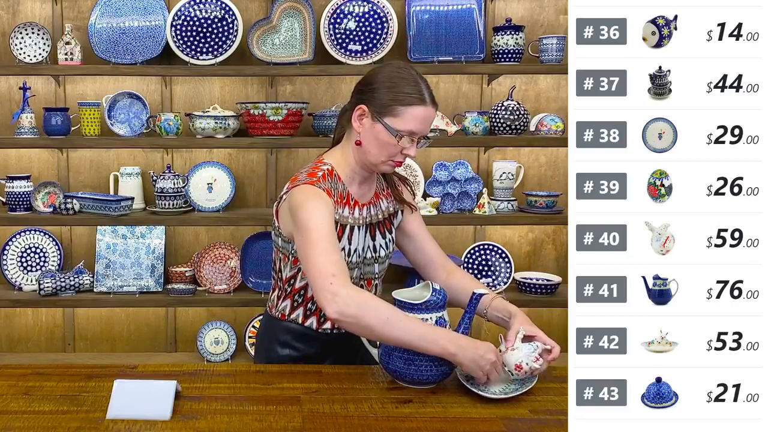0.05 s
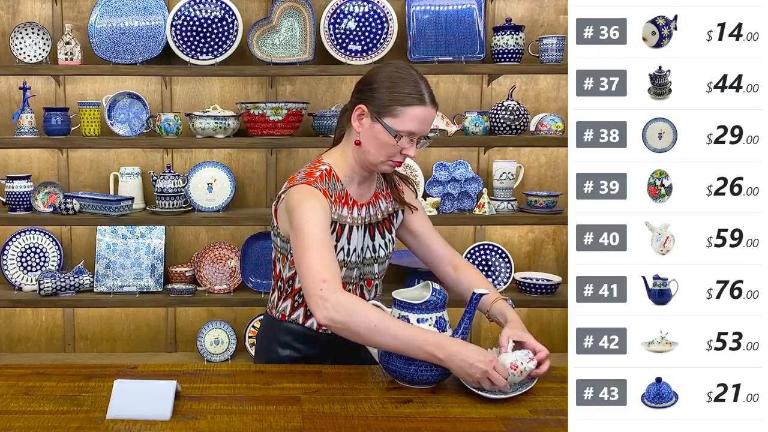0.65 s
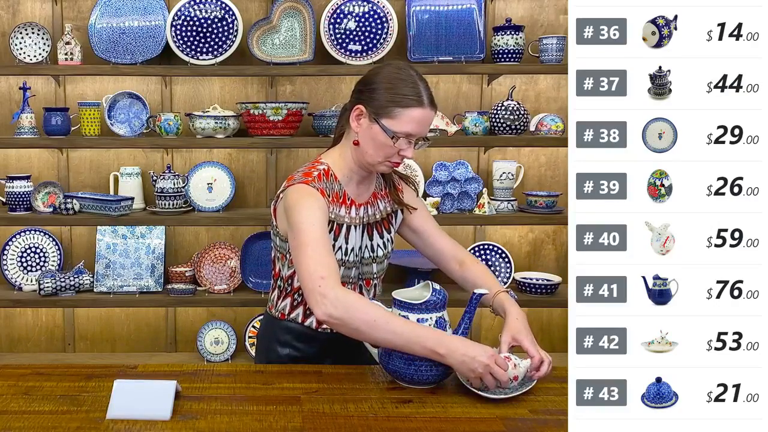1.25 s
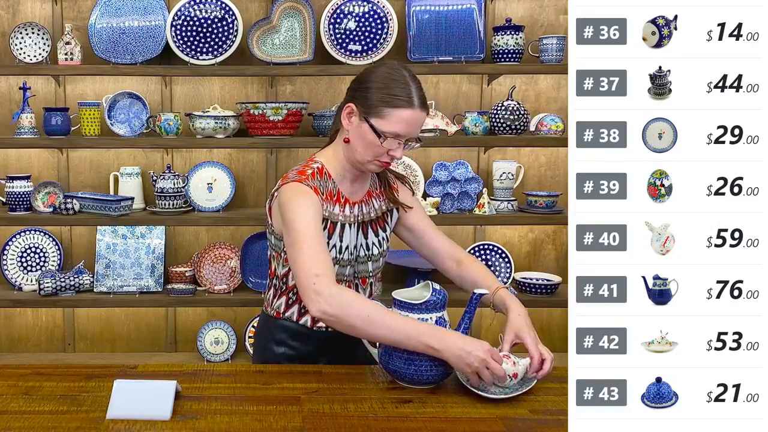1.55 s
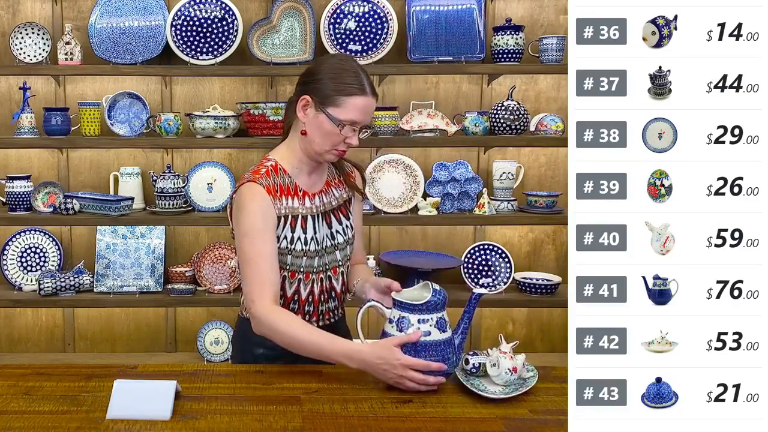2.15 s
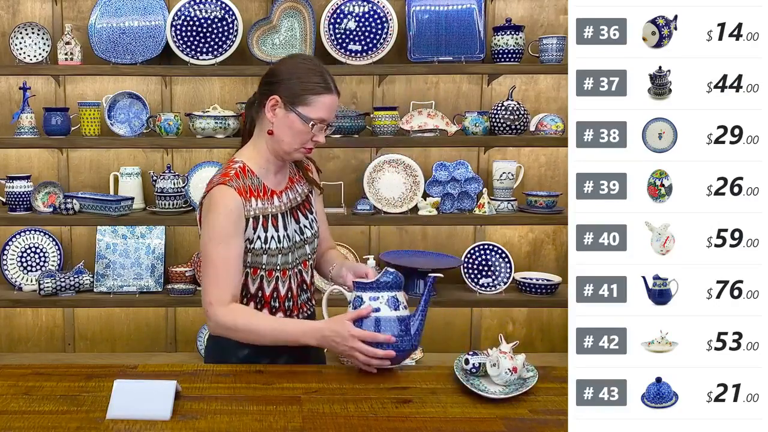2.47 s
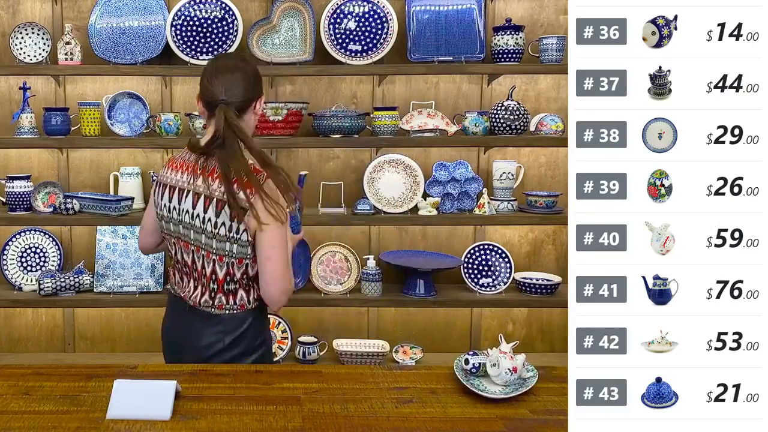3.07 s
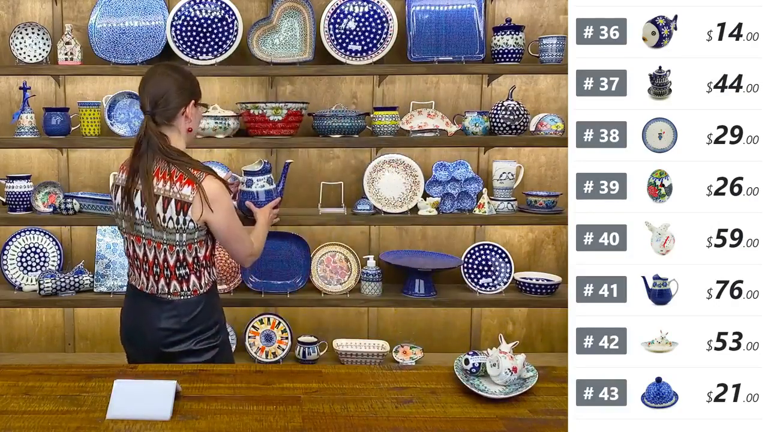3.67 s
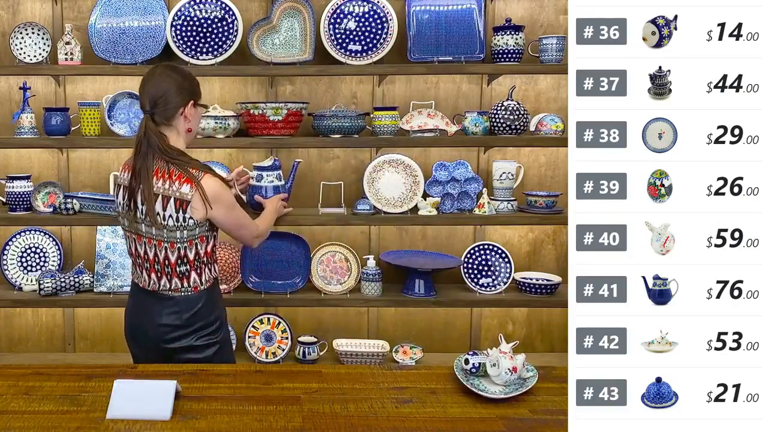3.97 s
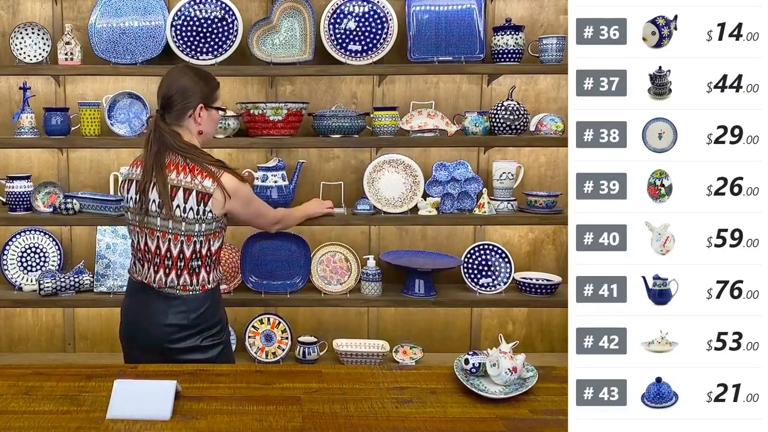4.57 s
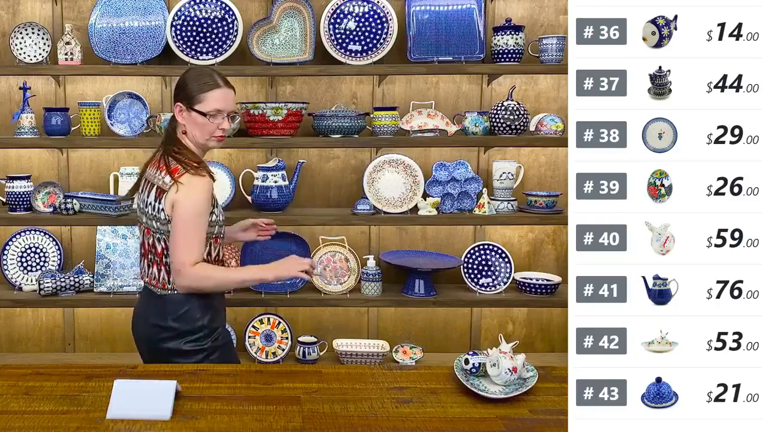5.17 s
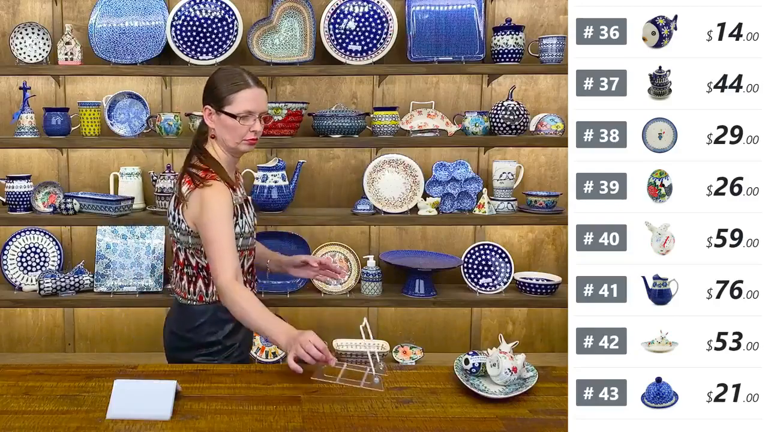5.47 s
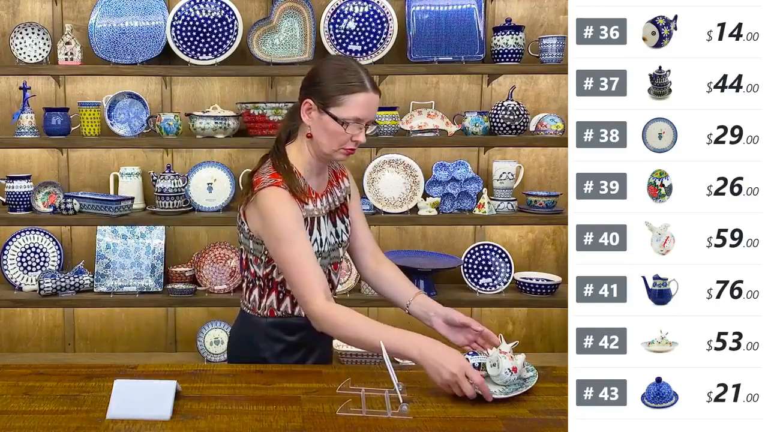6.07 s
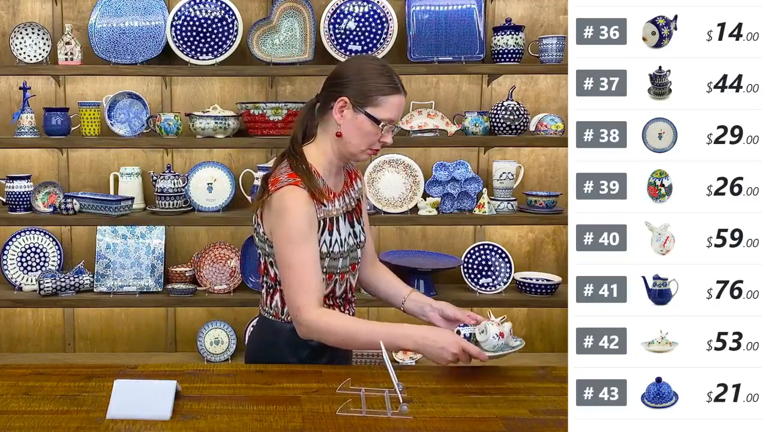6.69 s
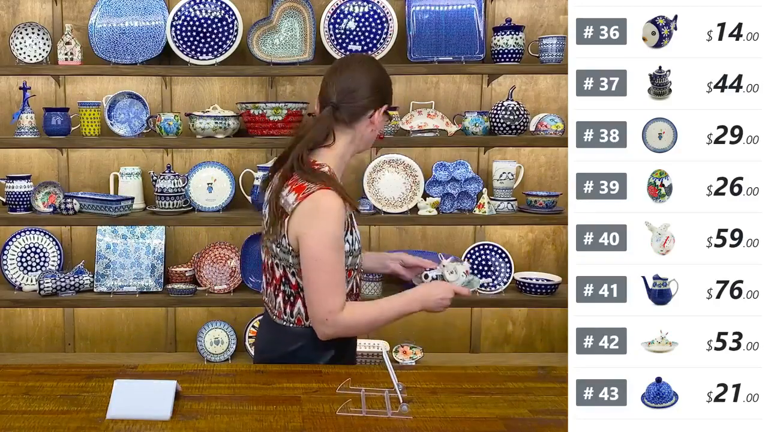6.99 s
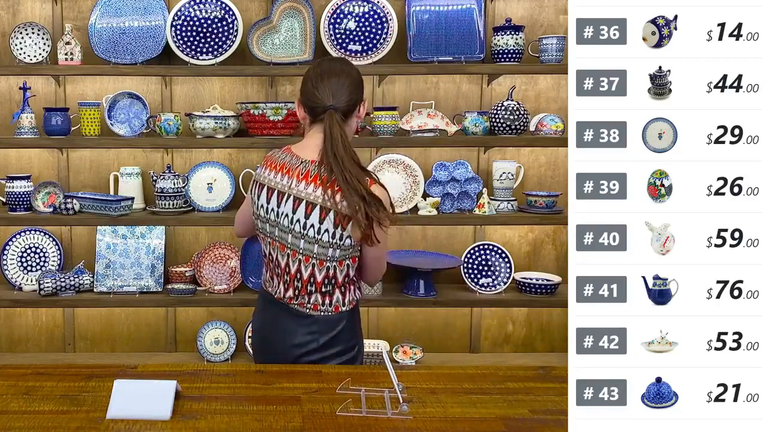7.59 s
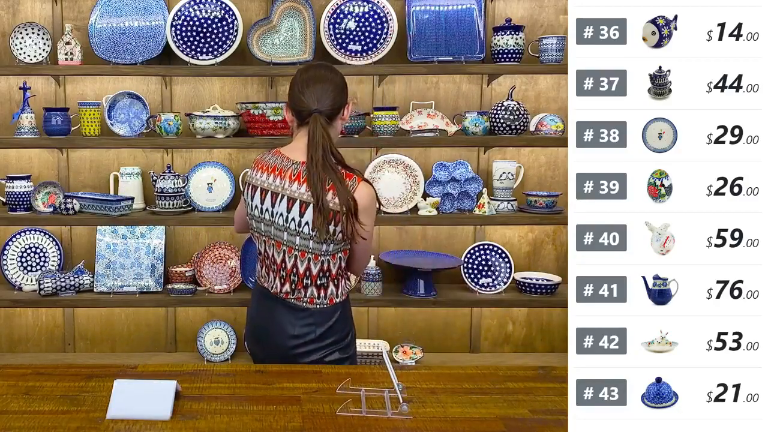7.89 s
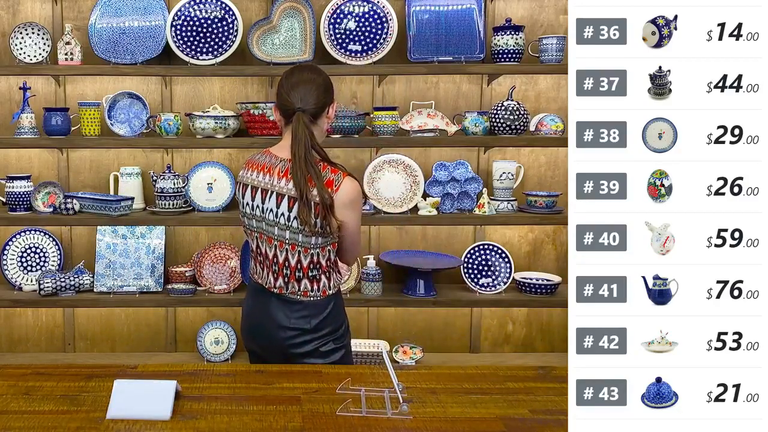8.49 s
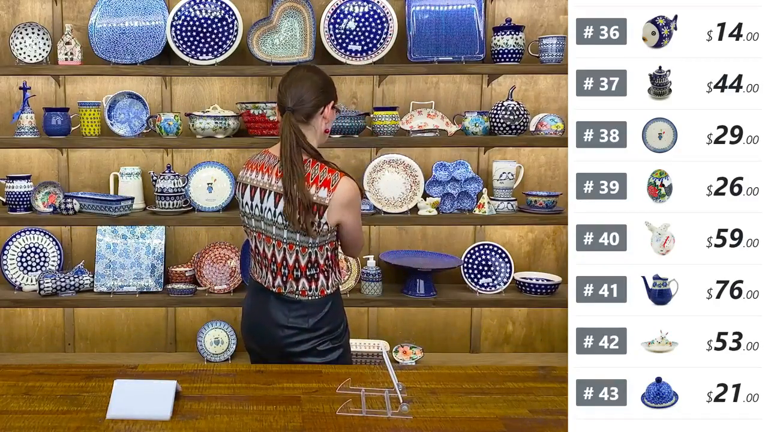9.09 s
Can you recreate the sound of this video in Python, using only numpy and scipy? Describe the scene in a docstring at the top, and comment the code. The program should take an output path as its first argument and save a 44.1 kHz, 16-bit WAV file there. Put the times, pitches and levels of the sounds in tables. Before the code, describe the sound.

Ceramic dishes clink together, slide and thud onto wood in a quiet room, with a small wire stand clattering midway.

```python
"""Glazed pottery clinks, squeaks and slides as it is handled in a wood-panelled shop.
A creamer knocks on a plate; a teapot is dragged off the counter and set on a shelf; a display stand is
fetched and clatters down; the plate is carried off, rattling, and shelved. Each blow clacks, rings the
piece and thuds into the wood; slides and swishing clothes are showers of tiny slips.
A bracelet jingles faintly, and the room rings with it all, over a low rush of ventilation."""
import sys
import numpy as np
from scipy import signal
from scipy.fft import rfft, irfft, next_fast_len
from scipy.io import wavfile
from scipy.ndimage import uniform_filter1d

SR = 44100
rng = np.random.default_rng(int(sys.argv[2]) if len(sys.argv) > 2 else 0)


def generate_wav(sig):
    """Save sig (samples, or channels by samples) to the path in sys.argv[1] as 16-bit PCM at SR."""
    pcm = np.round(np.clip(np.atleast_2d(sig).T, -1, 1) * 32767).astype(np.int16)
    wavfile.write(sys.argv[1], SR, pcm)


N = 411894
T = np.arange(N) / SR
RING_T = T[:SR // 2]


def undb(db):
    """Decibels to gain."""
    return 10 ** (np.asarray(db) / 20)


def at_hz(points, hz):
    """Read a curve of (f/Hz, value) points on a log-frequency axis."""
    f, value = np.transpose(points)
    return np.interp(np.log(np.maximum(hz, 1)), np.log(f), value)


def colour(x, points):
    """EQ a sound with (f/Hz, level/dB) points and bring it to rms 1."""
    size = next_fast_len(len(x))
    eq = undb(at_hz(points, np.fft.rfftfreq(size, 1 / SR)))
    y = irfft(rfft(x, size) * eq, size)[:len(x)]
    return y / y.std()


def decay(t60, t=RING_T):
    """Exponential envelope, 60 dB down after t60 seconds."""
    return np.exp(-np.log(1000) * t / t60)


def attack_level(x, db):
    """Set the rms level of a hit's first 20 ms."""
    return x * undb(db) / np.sqrt(np.mean(x[:SR // 50] ** 2))


def wander(knots_per_s):
    """Slewed random modulation with a spread near 1."""
    knots = rng.standard_normal(N // 10)
    return np.interp(T * knots_per_s, np.arange(len(knots)), knots)


def impulses(per_s):
    """Clicks of random size at random times."""
    return (rng.random(N) < per_s / SR) * rng.standard_normal(N)


def ring(modes, scatter_db=-1.5, detune=0.0018, split=0.0077, twin_db=-8):
    """Decaying modes: the struck spot sets their strength, and asymmetry gives each a beating twin."""
    out = 0
    for hz, db, t60 in modes:
        polarity, strength, mistune, spacing, twin_polarity = rng.standard_normal(5)
        phase = 2 * np.pi * hz * (1 + detune * mistune) * RING_T
        main = np.sign(polarity) * np.sin(phase)
        twin = undb(twin_db) * np.sign(twin_polarity) * np.sin(phase * (1 + split * spacing))
        out = out + undb(db + scatter_db * strength) * decay(t60) * (main + twin)
    return out


def burst(spectrum, t60, rise_s=0.00019):
    """Crowded, damped modes: coloured noise that builds during the contact and dies fast."""
    noise = colour(rng.standard_normal(len(RING_T)), spectrum)
    return noise * decay(t60) * (1 - np.exp(-RING_T / rise_s))


def soften(x, hz, low_hz=700):
    """A softer contact pushes for longer and loses treble; a small body radiates little bass."""
    band = [low_hz, np.clip(hz, 1.5 * low_hz, SR / 2.3)]
    return signal.sosfilt(signal.butter(2, band, "bandpass", fs=SR, output="sos"), x)


def strokes(rows, steepness):
    """Envelope of hand strokes: speed ramps up and down, and gain is a power of speed."""
    return sum(undb(db) * np.interp(T, [s - rise, s, s + fall], [0, 1, 0]) ** steepness
               for s, rise, fall, db in rows)


def friction(gain, spectrum, slips_per_s, uneven_db):
    """Tiny slips excite a body; the grip comes and goes."""
    slips = impulses(slips_per_s) * undb(uneven_db * wander(45))
    return colour(slips, spectrum) * gain


def rattle(spells, modes, touches_per_s=300):
    """Swells of tiny touches ring a few modes; a spell of negative length ends at its cue time."""
    swell = sum(undb(db) * np.sin(np.pi * np.clip((T - s) / length, 0, 1)) for s, length, db in spells)
    touches = impulses(touches_per_s)
    response = ring(modes)
    return signal.oaconvolve(swell * touches / touches.std(), response / np.linalg.norm(response))[:N]


# room tone spectrum: f/Hz, level/dB
AIR_EQ = [(25, -8.5), (90, 5), (190, -2.5), (450, -7.5), (800, -9), (1800, -18), (4300, -26.5), (7500, -45),
          (11000, -57.5), (16000, -42.5)]
def air(level_db=-53):
    """Steady low rush of the shop's ventilation."""
    return colour(rng.standard_normal(N), AIR_EQ) * undb(level_db)


# cloth spectrum: f/Hz, level/dB
CLOTH_EQ = [(80, -31), (250, 5.5), (900, -1.5), (2200, 0.5), (4500, 0), (7000, -6.5), (11000, -11.5),
            (16000, -19)]
# cloth moves: peak t/s, rise/s, fall/s, level/dB
SWISHES = [(.22, 0.73, 0.86, -50.5), (.755, 0.1, 0.19, -46), (1.85, 0.18, .35, -47.5),
           (2.99, 0.15, 0.25, -53), (3.26, 0.29, 0.21, -53), (3.48, 0.7, 0.32, -55),
           (6.05, 0.99, 0.11, -49.5), (7.765, 0.12, 0.086, -53)]
def clothes(rustle_db=-65.5):
    """Fabric rubs with each move and never quite comes to rest."""
    gain = strokes(SWISHES, steepness=3.48) + undb(rustle_db)
    return friction(gain, CLOTH_EQ, slips_per_s=9000, uneven_db=3.0)


# glaze squeaks, and one shoe creaking on the floor at 2.839 s: t/s, length/s, start f/Hz, end f/Hz, level/dB,
# jitter/share of pitch
SQUEAKS = [(0.075, 0.0935, 919, 768, -47, 0.06), (0.164, 0.094, 1551, 2534, -44, 0.09),
           (0.347, 0.12, 2130, 2406, -46.5, 0.0435), (2.839, 0.4, 1002, 821, -54.5, 0.0826)]
def squeaks(overtone_db=-4.0):
    """Rubbed glaze sticks and slips, and once a shoe creaks on the floor: a rough tone that swells and glides
    with the speed of the slide."""
    out = np.zeros(N)
    for s, length, first_hz, last_hz, db, jitter in SQUEAKS:
        span = (T > s) & (T < s + length)
        progress = (T[span] - s) / length
        pitch = (first_hz + (last_hz - first_hz) * progress) * (1 + jitter * wander(700)[span])
        phase = 2 * np.pi * np.cumsum(pitch) / SR
        tone = sum(undb(overtone_db * k) * np.sin((k + 1) * phase) for k in range(4))
        out[span] += undb(db) * np.sin(np.pi * progress) * tone
    return out


# action at the shelves: start t/s, end t/s
AT_SHELF = [(3, 5.2), (7.5, 9.4)]
def on_shelf(s):
    """Whether a cue plays at the shelves rather than the counter."""
    return any(start < s < end for start, end in AT_SHELF)


# panel modes: f/Hz, level/dB, t60/s
SHELF_MODES = [(108.4, -15, 0.32), (137.1, -13, 0.36), (262, -1, 0.14), (381.8, -1.5, 0.12),
               (480, -2, 0.12), (772, -8.5, 0.075), (1360, -15, 0.081)]
COUNTER_MODES = [(129.6, -15.5, 0.65), (259.6, -5.5, 0.37), (367, 3, 0.34), (421, 4.5, 0.13),
                 (495, 0.5, 0.104)]
# knock spectra: f/Hz, level/dB
SHELF_EQ = [(40, -15), (110, -13.5), (280, 5.5), (480, 4), (900, -2.5), (1600, -11.5), (2300, -41),
            (5000, -25), (15000, -47)]
COUNTER_EQ = [(40, -52.5), (180, -33), (350, -4.5), (600, 0.5), (1100, -6), (1700, -4.5), (2800, -24),
              (6000, -23.5), (15000, -26.5)]
def wood(s):
    """The board under a piece thuds: a dull knock plus panel modes that shift with the spot."""
    if on_shelf(s):
        knock = burst(SHELF_EQ, t60=0.075, rise_s=0.0021)
        panel = attack_level(ring(SHELF_MODES, detune=0.019), db=-0.6)
    else:
        knock = burst(COUNTER_EQ, t60=0.33)
        panel = attack_level(ring(COUNTER_MODES, detune=0.019), db=3.7)
    return soften(attack_level(knock, db=0) + panel, hz=7950, low_hz=76.3)


# contact transient spectrum: f/Hz, level/dB
CLACK_EQ = [(250, 8.5), (900, -12.5), (1400, 9), (2200, 2), (3200, 0.5), (5500, -9.5), (7700, -10.5),
            (10000, -9), (13500, -9.5), (16000, -12)]
def blows(hits, modes, clack_t60, clack_rise_s):
    """Each blow rings the piece, clacks at the contact and thuds into the wood."""
    out = np.zeros(N)
    for s, ring_db, clack_db, wood_db, contact_hz in hits:
        tone = soften(ring(modes), contact_hz)
        clack = soften(burst(CLACK_EQ, clack_t60, clack_rise_s), contact_hz, low_hz=317.0)
        hit = attack_level(tone, ring_db) + attack_level(clack, clack_db)
        hit += attack_level(wood(s), wood_db)
        start = int(s * SR)
        out[start:start + len(hit)] += hit[:N - start]
    return out


# creamer modes: f/Hz, level/dB, t60/s
CREAMER_MODES = [(1333, 4.5, 0.21), (1371, -9, 0.58), (2517, -1, 0.11), (2876, 5.5, 0.17),
                 (3245, 6.5, 0.097), (3910, 4, 0.046), (4490, 3, 0.075), (5150, -9.5, 0.33),
                 (6000, -6.5, 0.21), (8700, -16, 0.12), (9200, -12, 0.11)]
# clinks: t/s, ring level/dB, clack level/dB, wood level/dB, cut-off f/Hz
CREAMER_HITS = [(.259, -28, -34.5, -39.5, 5080), (.268, -29.5, -35.5, -36, 9050),
                (.944, -47, -50, -44, 4070), (1.365, -31.5, -38.5, -39, 5180),
                (1.644, -30.5, -32.5, -40, 4730), (1.794, -36, -38, -42, 4500)]
def creamer():
    """The small creamer clinks on the plate."""
    return blows(CREAMER_HITS, CREAMER_MODES, clack_t60=0.059, clack_rise_s=0.00067)


# handling ticks: t/s, clack level/dB, cut-off f/Hz
TICKS = [(0.53, -50, 2960), (1.922, -40, 3200), (4.252, -49, 3500), (6.463, -50, 1910), (6.741, -49, 3960),
         (7.280, -49, 3900), (7.649, -48.5, 4460), (7.829, -47, 4000), (8.475, -35.5, 5750),
         (8.681, -42, 3700), (9.09, -53.5, 3850)]
def ticks(ring_offset_db=-11, wood_offset_db=-9):
    """Crockery shifts in the hands: mostly clack, with a little creamer ring and wood."""
    hits = [(s, db + ring_offset_db, db, db + wood_offset_db, hz) for s, db, hz in TICKS]
    return blows(hits, CREAMER_MODES, clack_t60=0.058, clack_rise_s=0.00046)


# bracelet modes: f/Hz, level/dB, t60/s
BRACELET_MODES = [(3230, 3.5, 0.059), (5130, 4, 0.048), (6000, -9, 0.038), (8240, -4.5, 0.053),
                  (9400, -21, 0.037)]
# jingles: t/s, length/s, level/dB
BRACELET_JINGLES = [(1.19, 0.3, -57), (6.58, 0.25, -64), (7.38, 1.1, -65), (7.87, -0.9, -66), (8.5, 1, -73)]
def bracelet():
    """A bracelet jingles faintly as the hands move."""
    return rattle(BRACELET_JINGLES, BRACELET_MODES, touches_per_s=210)


# plate modes, struck and rattled: f/Hz, level/dB, t60/s
PLATE_MODES = [(1363, -5.5, 0.11), (1785, -0.5, 0.041), (2454.8, 6, 0.25), (2865, 5.5, 0.049),
               (3200, -1.5, 0.069), (3887, 0.5, 0.087), (4500, -3.5, 0.1), (5280, -11.5, 0.28),
               (6166, -13.5, .17), (6340, -12, 0.22), (6970, -4.5, 0.31), (8490, -7, 0.26),
               (10300, -8.5, 0.21), (11250, -17, 0.21), (13000, -16.5, 0.1)]
PLATE_CHATTER = [(7030, 6.5, 0.104), (8520, 5.5, .07), (10500, -8.5, 0.046), (11400, -12, .05)]
# a firm grip's boost or cut of the modes: f/Hz, level/dB
GRIP_EQ = [(1400, 7), (1850, 4), (2450, -6.5), (2900, 0), (3200, 6.5), (3870, 3.5), (4500, 4.5),
           (8500, -12)]
# clinks: t/s, ring level/dB, clack level/dB, wood level/dB, cut-off f/Hz
PLATE_HITS = [(1.367, -44, -45, -61, 6950), (1.646, -34.5, -41.5, -61, 15100),
              (1.699, -27.5, -31, -32, 15000), (1.713, -27, -30.5, -36, 14000),
              (1.734, -28.5, -41, -41, 15000), (1.751, -27.5, -49.5, -34.5, 13000),
              (1.775, -44, -44, -42, 12000), (1.826, -35.5, -47.5, -51, 6930),
              (6.322, -59, -40.5, -44, 3930), (6.355, -48.5, -53, -57, 12000),
              (7.072, -51.5, -47.5, -58, 12100), (7.081, -38.5, -45, -73, 6000),
              (8.118, -59, -30.5, -21.5, 2460), (8.152, -29, -30, -33.5, 6980),
              (8.275, -42, -40, -31, 1916), (8.3195, -28.5, -27.5, -21.5, 6000),
              (8.398, -54.5, -38.5, -31.5, 3000)]
# rim rattle: t/s, length/s, level/dB
PLATE_RATTLES = [(6.33, -0.01, -45)]
def plate(grip_t60=0.18):
    """The plate rings freely at the counter and chatters as it lifts; at the shelf, hands choke it."""
    held_modes = [(hz, db + at_hz(GRIP_EQ, hz), min(t60, grip_t60)) for hz, db, t60 in PLATE_MODES]
    clinks = np.zeros(N)
    for hit in PLATE_HITS:
        modes = held_modes if on_shelf(hit[0]) else PLATE_MODES
        clinks += blows([hit], modes, clack_t60=0.12, clack_rise_s=0.00031)
    return clinks + rattle(PLATE_RATTLES, PLATE_CHATTER, touches_per_s=120)


# drag spectrum: f/Hz, level/dB
DRAG_EQ = [(60, -26), (105, -23.5), (133, 13.5), (175, -12.5), (240, -6), (480, -6.5), (700, -15.5),
           (1050, -15), (1900, -24.5), (4000, -35.5), (15000, -47)]
# pulls: peak t/s, rise/s, fall/s, level/dB
DRAGS = [(2.12, 0.141, 0.076, -49), (2.215, 0.11, 0.02, -44.5), (2.31, 0.13, 0.25, -39)]
def teapot_drag():
    """The teapot slips across the counter with a low groan."""
    return friction(strokes(DRAGS, steepness=1.54), DRAG_EQ, slips_per_s=1200, uneven_db=1.5)


# lid modes, struck and rattled: f/Hz, level/dB, t60/s
LID_MODES = [(5200, -8, 0.14), (9900, -21, 0.082)]
LID_CHATTER = [(4430, 0, 0.047), (7565, 0, 0.012)]
# clinks: t/s, ring level/dB, clack level/dB, wood level/dB, cut-off f/Hz
LID_HITS = [(3.639, -40, -41, -49, 8950), (4.460, -58, -64, -78, 12000)]
# rattles: t/s, length/s, level/dB
LID_RATTLES = [(2.14, 0.41, -64), (2.68, 0.079, -65)]
def lid():
    """The loose lid jiggles and clinks brightly as the teapot moves."""
    clinks = blows(LID_HITS, LID_MODES, clack_t60=0.056, clack_rise_s=0.0011)
    return clinks + rattle(LID_RATTLES, LID_CHATTER)


# teapot modes: f/Hz, level/dB, t60/s
TEAPOT_MODES = [(1310, 5.5, 0.033), (1816, -11.5, 0.105), (3088, -11, 0.11), (3340, -2, 0.043),
                (4220, -26, 0.91), (5100, -2, 0.038), (5600, 6, 0.094), (5750, -17, 0.052),
                (6820, -18, 0.064), (8800, -15, 0.048)]
# knocks: t/s, ring level/dB, clack level/dB, wood level/dB, cut-off f/Hz
TEAPOT_HITS = [(3.633, -49, -45, -29.5, 2440), (3.640, -35, -31, -27, 4100),
               (4.084, -29.5, -28, -21.5, 2780), (4.090, -27, -28.5, -21, 4500),
               (4.099, -22, -41, -32, 13000), (4.243, -67, -54.5, -28.5, 2520),
               (8.121, -44.5, -60.5, -67, 12000)]
def teapot():
    """The teapot lands on the shelf with a blunt clack and plenty of wood."""
    return blows(TEAPOT_HITS, TEAPOT_MODES, clack_t60=0.037, clack_rise_s=0.00224)


# stand modes, struck and rattled: f/Hz, level/dB, t60/s
STAND_MODES = [(1039, 2.5, 0.049), (1798, -23, 0.11), (2340, -10, 0.1), (2968.6, -18, 0.1),
               (4220, 5, 0.041), (4810, -6, 0.032), (6510, 2, 0.033), (6990, -4.5, 0.11)]
STAND_CHATTER = [(6330, 0.88, 0.015), (6890, -1, 0.021)]
# clatter: t/s, ring level/dB, clack level/dB, wood level/dB, cut-off f/Hz
STAND_HITS = [(4.66, -65.5, -61, -43, 3970), (5.096, -65, -58, -75, 14000),
              (5.572, -36.5, -35.5, -25.5, 2130), (5.604, -31.5, -49, -31, 1400),
              (5.691, -43, -39, -37, 3520), (5.703, -35, -33.5, -41, 10000), (5.727, -38, -33, -37, 6000),
              (5.749, -31.5, -34, -37, 6700)]
# wire buzz: t/s, length/s, level/dB
STAND_RATTLES = [(4.65, 0.39, -57.5)]
def stand():
    """The display stand's wires buzz as it slides, then it clatters onto the counter."""
    clatter = blows(STAND_HITS, STAND_MODES, clack_t60=0.17, clack_rise_s=0.00026)
    return clatter + rattle(STAND_RATTLES, STAND_CHATTER)


# scrape spectrum: f/Hz, level/dB
SCRAPE_EQ = [(100, -12.5), (380, 7.5), (700, -0.5), (1450, 3.5), (2100, -4.5), (2800, -6), (5600, -21.5),
             (6700, -24), (8000, -24), (15000, -33)]
# slides: peak t/s, rise/s, fall/s, level/dB
SCRAPES = [(4.865, 0.035, 0.061, -49), (4.92, 0.26, 0.096, -40), (8.45, 0.082, 0.74, -43.5),
           (9.02, 0.136, 0.074, -53)]
def shelf_scrapes():
    """Pieces slide along a shelf with a grainy midrange rasp."""
    return friction(strokes(SCRAPES, steepness=1.85), SCRAPE_EQ, slips_per_s=2400, uneven_db=3.0)


# humming counter modes: f/Hz, level/dB, t60/s
COUNTER_HUM = [(133.5, -1.5, 0.43), (263, 1.5, 0.14), (475, -4.5, 0.12)]
# judders: t/s, length/s, level/dB
JUDDERS = [(5.7, 0.4, -46.5), (6.33, 0.1147, -37)]
def judder():
    """A piece judders over the counter and sets the board humming."""
    return rattle(JUDDERS, COUNTER_HUM)


def even_out(response, smooth_bins=21, length_s=0.025):
    """A short causal EQ flattens the synthetic reverb's chance peaks and dips, so clinks ring evenly."""
    power = uniform_filter1d(np.abs(rfft(response)) ** 2, smooth_bins)
    cepstrum = irfft(-np.log(power / power.mean()))[:SR // 2]
    cepstrum *= np.exp(-(RING_T / length_s) ** 2)
    cepstrum[0] /= 2
    return irfft(rfft(response) * np.exp(rfft(cepstrum, SR)))


# reverb decay: f/Hz, t60/s
ROOM_DECAY = [(100, 0.926), (300, 0.46), (1000, 0.34), (3000, 0.39), (6000, 0.33), (14000, 0.289)]
def room(x, early_db=0.5, early_t60=0.16, echoes_per_s=1200, late_db=-5.5, gap_s=0.003, build_s=0.0052):
    """Counter and shelves throw back quick echoes; a diffuse tail follows, longest in the bass."""
    t, hz = T[:SR], np.fft.rfftfreq(SR, 1 / SR)
    echoes = (rng.random(SR) < echoes_per_s / SR) * rng.choice([-1, 1], SR)
    echoes = echoes * decay(early_t60, t) * (t > gap_s)
    hiss, tail = rfft(rng.standard_normal(SR)), 0
    centres_hz, t60s = np.transpose(ROOM_DECAY)
    for share, t60 in zip(np.eye(len(t60s)), t60s):
        band = at_hz(np.column_stack([centres_hz, share]), hz)
        tail = tail + irfft(hiss * band) * decay(t60, t) * (1 - np.exp(-t / build_s))
    early = undb(early_db) * echoes / np.linalg.norm(echoes)
    late = undb(late_db) * tail / np.linalg.norm(tail)
    return signal.oaconvolve(x, even_out((t == 0) + early + late))[:N]


def scene():
    """Mono mix: all the handling goes through the room, over a bed of air."""
    clinks = creamer() + bracelet() + ticks() + plate() + lid() + teapot() + stand()
    rubbing = clothes() + squeaks() + teapot_drag() + shelf_scrapes() + judder()
    return (room(clinks + rubbing) + air())[None]


def record(dry, top_hz=15900):
    """A steep low-pass trims the top end."""
    return signal.sosfilt(signal.ellip(10, 0.2, 80, top_hz, fs=SR, output="sos"), dry)


dry = scene()
out = record(dry)
generate_wav(out)
```